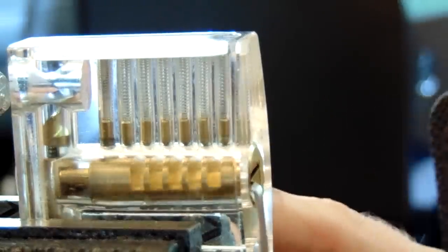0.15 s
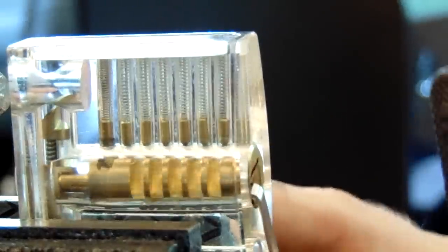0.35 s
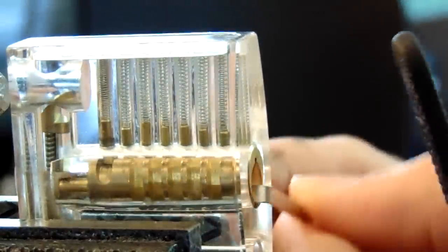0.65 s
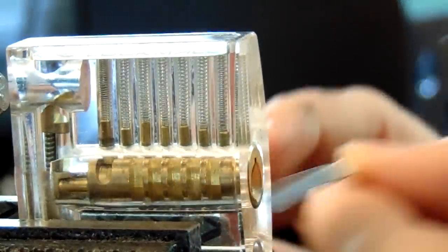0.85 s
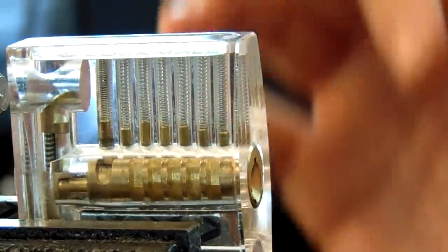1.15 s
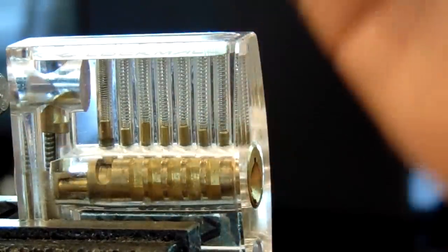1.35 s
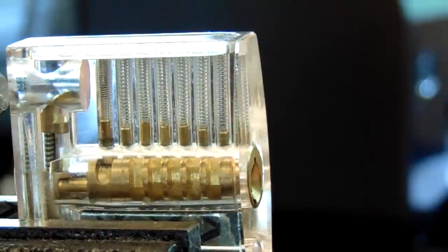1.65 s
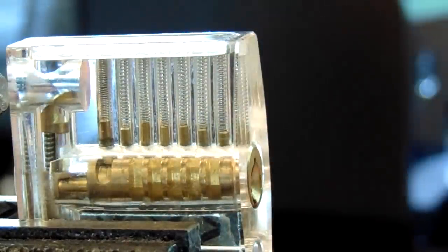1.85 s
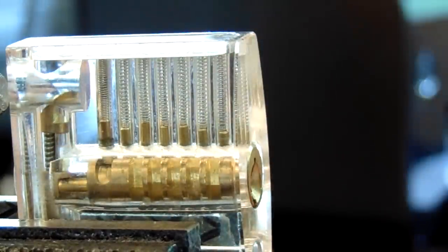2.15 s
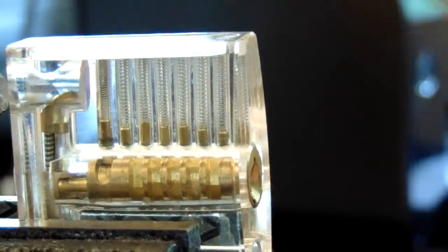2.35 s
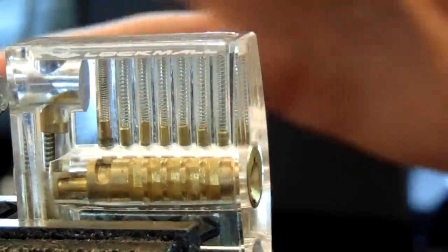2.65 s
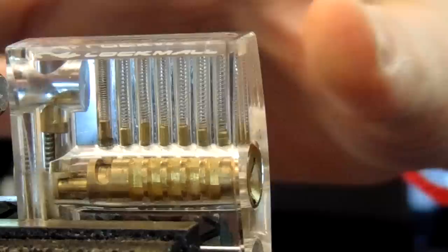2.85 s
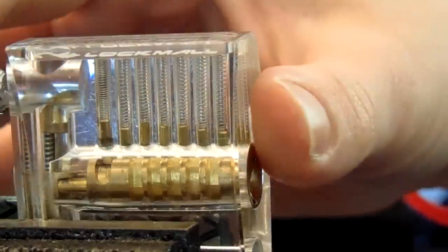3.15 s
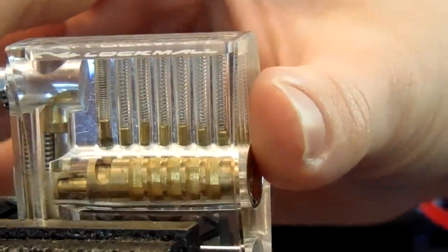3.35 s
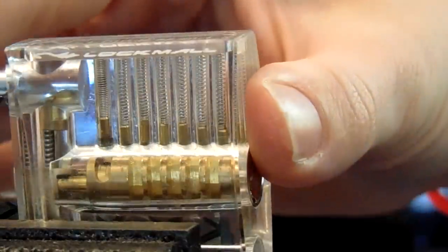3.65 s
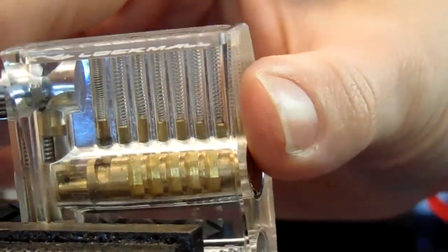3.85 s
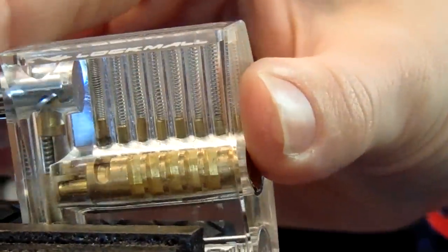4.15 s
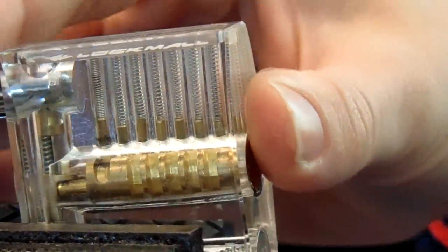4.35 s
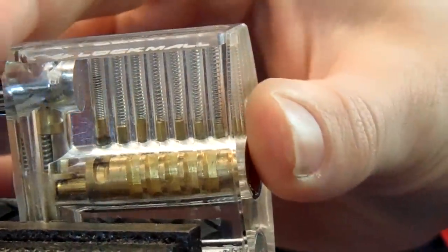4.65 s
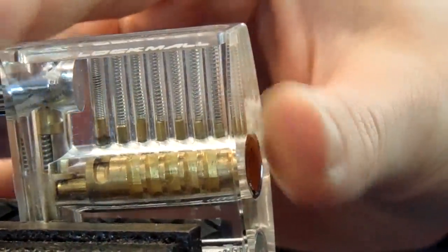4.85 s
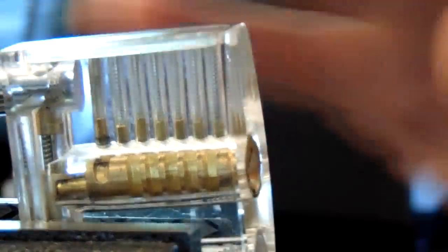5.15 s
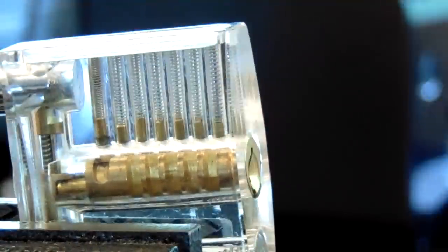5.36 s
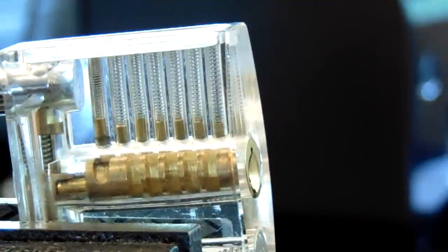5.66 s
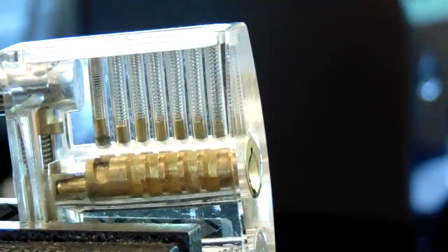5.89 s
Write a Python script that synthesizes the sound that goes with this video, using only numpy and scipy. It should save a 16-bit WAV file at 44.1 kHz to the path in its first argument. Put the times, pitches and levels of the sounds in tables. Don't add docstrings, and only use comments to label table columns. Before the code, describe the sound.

Close metallic ticks and clinks of a tool removed and set down, a few padlock clicks, then one hard snap in a small room.

```python
import sys
import numpy as np
from scipy import signal
from scipy.fft import rfft
from scipy.io import wavfile
from scipy.ndimage import uniform_filter1d

SR = 44100
rng = np.random.default_rng(int(sys.argv[2]) if len(sys.argv) > 2 else 0)


def magnitude_from_level(level_db):
    exponent = np.asarray(level_db, float) / 20
    return 10 ** exponent


def wav_record(signal):
    frames = np.transpose(np.atleast_2d(signal))
    bounded = np.clip(frames, -1, 1)
    quanta = np.round(bounded * 32767).astype(np.int16)
    wavfile.write(sys.argv[1], SR, quanta)


N = 265614

# start in seconds, peak level in dB, rattle t60 in seconds,
# tilt in dB per octave about 5 kHz.
PULL_STRIKES = [
    (.6018, -24, .03, 4),
    (.6053, -8.5, 0.026, -3),
    (.6075, -7, 0.011, -4.5),
    (.6115, -19, 0.014, -6),
    (.6155, -23, .02, -3),
    (.6205, -21, 0.041, 5),
]
FREE_STRIKES = [
    (.6392, -16, 0.016, -0.13),
    (.6458, -17, 0.02, -1.8),
    (.652, -23, 0.018, -0.88),
]
SETTLE_STRIKES = [
    (.8497, -22, 0.011, 4),
    (.858, -49, .012, 1.),
    (.8645, -43, 0.014, 3),
    (.9968, -34, 0.024, -1.5),
    (1.006, -41, 0.013, -2.2),
]
LAY_STRIKES = [
    (2.0092, -29, 0.018, 0.),
    (2.0103, -23.5, 0.07, 0.0),
    (2.0134, -22.5, 0.036, 0.0),
    (2.0314, -30, 0.034, 0.0),
    (2.043, -29.5, 0.051, 0.0),
]
DROP_STRIKES = [
    (2.2252, -22.5, 0.071, -1),
    (2.2388, -30, 0.017, 0),
    (2.2503, -25, 0.099, 0.5),
    (2.2638, -22.5, 0.089, 1.5),
]
SCRAPE_STRIKES = [
    (2.3654, -25.5, 0.068, 0.0),
    (2.373, -22, 0.069, 0.0),
    (2.3764, -21.5, 0.03, 0.0),
    (2.3824, -31, 0.03, 0.0),
]
SLIDE_STRIKES = [
    (2.4326, -22, 0.11, 0.0),
    (2.4405, -24, 0.056, 0.0),
    (2.4502, -25.5, 0.12, 0.0),
    (2.461, -39, 0.033, 0.0),
    (2.4754, -27, 0.058, 0.0),
    (2.4894, -32, 0.15, 0.0),
]

# start in seconds, peak level in dB, rattle t60 in seconds,
# tilt in dB per octave about 5 kHz.
TOUCH_STRIKES = [
    (3.483, -29, 0.04, 0.0),
]
CATCH_STRIKES = [
    (3.7312, -20.5, 0.0047, 1),
    (3.7323, -21, 0.033, 0.),
    (3.740, -31.5, 0.014, 2.),
    (3.747, -39, 0.013, 2.4),
]
PUSH_STRIKES = [
    (3.9345, -39, 0.036, -1.5),
    (3.9393, -11.5, 0.013, -1),
    (3.9408, -18.5, 0.022, -1.5),
    (3.9468, -16, .014, 4.5),
    (3.954, -26, .015, 4),
]
PIN_STRIKES = [
    (4.124, -45.5, 0.049, -16),
    (4.1812, -44.5, .014, -12),
    (4.429, -25, 0.026, 0),
    (4.4325, -30, 0.023, 4.5),
]
SNAP_STRIKES = [
    (4.2256, -14, .01, 8.5),
    (4.2261, 2.5, .022, -0.5),
    (4.2276, 0.5, .018, 0.5),
    (4.2305, 2, 0.031, -3.5),
    (4.2345, -6.5, 0.014, 0),
    (4.2412, -7, .011, 6),
]

# broad colour (Hz, dB per Hz), resonances (Hz, width in Hz, dB over the colour),
# room level in dB, tick share as a ratio to the rattle.
PULL_BODY = ([(700, -41), (1350, -19), (1900, -5), (4000, -3.5), (5500, -14), (8000, -12), (11000, 2),
             (14100, -0.5)], [(4500, 390, 5), (6500, 940, 17), (12700, 360, 8), (13670, 760, 21)], -13, 1.4)
FREE_BODY = ([(530, -51), (900, -19), (1490, -15), (1920, -3), (2660, -5), (7660, -12), (12100, 4),
             (14100, -2.5)], [(1920, 480, 1), (4400, 300, 3), (14000, 300, -1)], -10, .54)
SETTLE_BODY = ([(1500, -45.), (2500, -33), (4500, -2), (7000, -0.5), (14100, 5)], [(4520, 150, 18),
               (12000, 330, 6.3), (13700, 350, 9)], -12, .54)
LAY_BODY = ([(900, -23), (1800, -25), (3500, -18), (5500, -17), (8000, -11.5), (10000, -10), (12500, -2),
            (14100, -12)], [(3310, 200, 6.6), (4270, 130, 11), (6340, 130, 5.), (7810, 150, 12),
            (8500, 150, 6.), (10920, 120, 10.5), (13200, 280, 6.9)], -7.5, .3)
DROP_BODY = ([(530, -32), (900, -12), (1970, -15.5), (3800, -16), (5810, -14.5), (7320, -13), (12300, -0.5),
             (14100, -9)], [(2040, 110, 12.4), (3770, 410, 22), (5250, 140, 12), (7220, 890, 19),
             (9700, 150, 7.4), (10800, 200, 1.3333), (12000, 300, 6), (13200, 200, 5)], -4, 3.4)
SCRAPE_BODY = ([(1180, -59), (2000, -26), (5880, -22.5), (7960, -9.5), (10100, -16), (11800, -10),
               (12700, 0), (14100, -16)], [(6670, 200, 10.6), (7800, 400, 3.), (10920, 170, 21),
               (13600, 300, 8.5)], -7, .1)
SLIDE_BODY = ([(1180, -52), (2000, -30), (2960, -28), (5120, -16.5), (5980, -15), (9600, -7), (10400, -8),
              (14100, -2.5)], [(5230, 110, 8.6), (7960, 230, 6.8), (9750, 130, 7.6), (11070, 150, 12),
              (12200, 200, 3.)], -12.5, 0.36)
TOUCH_BODY = ([(350, -49), (600, -18), (1210, 0.5), (2530, -10), (4590, -11.5), (5590, -8), (7380, -18.5),
              (14100, -25)], [(2430, 300, 12), (5640, 130, 11), (6650, 350, 16.5), (9280, 140, 24.6)],
              -10.5, 0.46)
CATCH_BODY = ([(59, -39), (100, -31), (631, -11), (1360, -2.5), (3240, -11), (6290, -6.5), (6970, -15),
              (14100, -20)], [(2620, 310, 4.5), (3820, 430, 9.7), (6350, 480, 7), (9450, 170, 17)],
              -12, .54)
PUSH_BODY = ([(60, -36), (300, -25.5), (1000, -17), (2300, -15.5), (4500, -16), (7500, -21), (10500, -7.5),
             (14100, -9.5)], [(1680, 150, 2.4), (3258, 690, 12), (6200, 750, 10), (10500, 690, 5.)],
             -10.5, 0.19)
PIN_BODY = ([(300, -47.5), (1500, -18.5), (3000, -4), (8000, -7), (14100, -5.5)], [(1700, 400, 5.),
            (5100, 400, 4.), (6400, 400, 10.), (10000, 500, 8.)], -18, .54)
SNAP_BODY = ([(30, -26.5), (100, -26), (600, -25.5), (1200, -17), (5000, -8.5), (7500, -11), (11000, -7.5),
             (14100, -15.5)], [(1713, 200, 13.5), (3360, 210, 5), (4400, 300, -6), (6230, 400, 5),
             (9460, 280, 8.5), (11340, 500, 13), (12600, 300, 5)], -10.5, 0.34)

# start in seconds, level in dB, pitch in Hz, t60 in seconds.
THUDS = [
    (2.041, -49.5, 205, 0.13),
    (2.40, -50, 217, 0.17),
    (3.735, -51, 119, .1),
    (3.95, -46.5, 31.8, 0.25),
    (4.225, -29.5, 134.9, 0.053),
    (4.226, -36.5, 86.6, 0.12),
    (4.231, -37, 35.4, 0.35),
    (4.231, -37, 456, 0.25),
]
# frequency in Hz, t60 in seconds.
ROOM_T60 = [(80, 0.093), (300, 0.31), (700, 0.4), (1740, 0.3394), (4590, .42), (12100, 0.37)]

# pitch in Hz, level in dB, lag in seconds, t60 in seconds.
BARREL_MODES = [(1133, 4, 0.00174, 0.02), (918, -4, 0.00244, 0.035), (682, 5.5, 0.00176, 0.035),
                (435, 6.5, 0.00359, 0.018)]
HUNTS = [
    (6, 13),
    (73, 79),
    (153, 160),
]

# frequency in Hz, level in dB per Hz.
HISS_COLOUR = [(12, -43.5), (20, -14.5), (65, -8), (98, -14.5), (220, -13.5), (481, -18), (1220, -20),
               (14000, -32.5)]
# pitch in Hz, rms level in dB, wander in Hz.
HUM_LINES = [
    (57.8, -69.5, 2.2),
    (299, -65, 1.7),
]
# time in seconds, rms level in dB.
RUMBLE_LEVEL = [(0.0, -70), (.3, -61), (1.3, -64.5), (1.9, -78), (2.3, -66), (2.8, -83.5), (6.02, -83.5)]

HISS_DB = -55
RUMBLE_HZ, RUMBLE_WANDER_HZ, RUMBLE_WAVER_DB = 62.3, 1.9, -1
FRAMES_PER_S, SEARCH_STEPS, SWEEP_STEPS, PARK_FRAMES = 30, 5, 11, 11.45
EARLY_S, LATE_S = 0.00308, 0.00804
SEARCH_DB, SEARCH_RISE_DB, SWEEP_DB = -47, 0.1, -44
START_DB, PARK_DB, UNEVEN_DB = 3.5, -45, -0.46
EDGE_HZ = 14260


def evened(x):
    return x / np.sqrt(np.mean(x ** 2) + 1e-20)


def read(points, hz):
    f, value = np.transpose(points)
    return np.interp(np.log(hz + 1), np.log(f + 1), value)


def add(mix, start_s, sound):
    part = mix[round(start_s * SR):][:len(sound)]
    part += sound[:len(part)]


def drift(rate_hz):
    t = np.arange(N) / SR
    slow_hz = np.geomspace(rate_hz / 20, rate_hz, num=12)
    return evened(sum(np.sin(2 * np.pi * (f * t + rng.random())) for f in slow_hz))


def causal(gain):
    log_gain = np.log(np.r_[gain, gain[-2:0:-1]] + 1e-5)
    minimum_phase = np.exp(np.conj(signal.hilbert(log_gain)))
    return np.fft.ifft(minimum_phase).real[:len(gain) // 2]


def microphone_hiss():
    frames, hz = N // 512 + 5, np.fft.rfftfreq(2048, 1 / SR)
    a, b, patches = rng.standard_normal((frames, len(hz), 3)).T
    patches = uniform_filter1d(patches, size=20, axis=0)
    patches = evened(uniform_filter1d(patches, size=8, axis=1))
    level = magnitude_from_level(read(HISS_COLOUR, hz)[:, None] + 0.22 * patches)
    hiss = signal.istft((a + 1j * b) * level, nperseg=2048, noverlap=1536)[1]
    return magnitude_from_level(HISS_DB - 1.5) * evened(hiss[:N])


def mains_hum():
    out = np.zeros(N)
    for hz, db, wander_hz in HUM_LINES:
        level = np.sqrt(2) * magnitude_from_level(db + 0.68 * drift(12.))
        turns = np.cumsum(hz + wander_hz * drift(26.0)) / SR
        out += level * np.sin(2 * np.pi * turns)
    return out


def engine_rumble():
    rumble_db = np.interp(np.arange(N) / SR, *np.transpose(RUMBLE_LEVEL))
    rumble_db = rumble_db + RUMBLE_WAVER_DB * drift(10.0)
    turns = np.cumsum(RUMBLE_HZ + RUMBLE_WANDER_HZ * drift(9.)) / SR
    return np.sqrt(2) * magnitude_from_level(rumble_db) * np.sin(2 * np.pi * turns)


def motor_steps():
    search, sweep, steps = np.arange(SEARCH_STEPS), np.arange(SWEEP_STEPS), []
    search_db = SEARCH_DB + SEARCH_RISE_DB * search + START_DB * (search == 0)
    sweep_db = SWEEP_DB + START_DB * (sweep == 0) / 2
    db = np.r_[search_db, sweep_db, PARK_DB]
    for out, back in HUNTS:
        frames = np.r_[out + search, back + sweep, back + PARK_FRAMES]
        late_s = LATE_S * rng.random(len(frames)) ** 2
        start_s = frames / FRAMES_PER_S - EARLY_S + late_s
        steps += zip(start_s, db + UNEVEN_DB * rng.standard_normal(len(db)))
    return steps


def focus_motor():
    t, out, steps = np.arange(1500) / SR, np.zeros(N), motor_steps()
    chances = rng.standard_normal((len(steps), len(BARREL_MODES), 3))
    for (start_s, db), chance in zip(steps, chances):
        knock = np.zeros(len(t))
        for (hz, mode_db, lag_s, t60_s), (detune, wobble, turn) in zip(BARREL_MODES, chance):
            u = np.maximum(t - lag_s, 0)
            shape = magnitude_from_level(mode_db + 0.88 * wobble - 60 * u / t60_s) * (1 - np.exp(-u / 0.001))
            knock += shape * np.sin(2 * np.pi * hz * (1 + 0.031 * detune) * u + 0.6 * turn)
        knock *= magnitude_from_level(db + 1.5) / abs(knock).max()
        add(out, start_s - .001, knock)
        whirr = signal.fftconvolve(knock, rng.standard_normal(1500))
        add(out, start_s + 0.00408, magnitude_from_level(db - 24.5) * evened(whirr))
    return out


def bench():
    t, out = np.arange(SR // 4) / SR, np.zeros(N)
    for start_s, db, hz, t60_s in THUDS:
        swell_and_decay = magnitude_from_level(db - 60 * t / t60_s) * (1 - np.exp(-t / .006))
        add(out, start_s, swell_and_decay * np.sin(2 * np.pi * hz * t))
    return out


def room(x):
    taps = np.zeros(SR // 2)
    at = np.arange(0, len(taps) - 10, 10)
    taps[at + rng.integers(0, 10, len(at))] = rng.choice([-1., 1.], len(at))
    hz, t, z = signal.stft(taps, SR, nperseg=256)
    decay = magnitude_from_level(-60 * t / read(ROOM_T60, hz)[:, None])
    tail = signal.istft(z * decay, SR, nperseg=256)[1]
    tail *= np.clip((np.arange(len(tail)) / SR - .004) / 0.013, 0, 1)
    return signal.oaconvolve(x, tail / np.linalg.norm(tail))[:N]


def struck(strikes, colour, peaks, room_db, tick):
    hz, t, out = np.fft.rfftfreq(8192, 1 / SR), np.arange(2048) / SR, np.zeros(N)
    rings = sum(magnitude_from_level(db) / (1 + (2 * (hz - f) / width) ** 2) for f, width, db in peaks)
    body = magnitude_from_level(read(colour, hz)) * (1 + rings)
    octaves = np.log2(np.maximum(hz, 300) / 5000)
    contacts = rng.standard_normal((len(strikes), len(t)))
    for (start_s, db, t60_s, tilt_db), rattle in zip(strikes, contacts):
        rattle = rattle * (magnitude_from_level(-60 * t / max(t60_s, .001)) + tick * np.exp(-t / 0.00014))
        even = np.sqrt(uniform_filter1d(abs(rfft(rattle, 8192)) ** 2, size=60))
        ring = signal.fftconvolve(rattle, causal(body / even * magnitude_from_level(tilt_db * octaves)))
        add(out, start_s, magnitude_from_level(db) * ring / abs(ring).max())
    flatter = causal((1 + rings) ** -.25)
    return out + magnitude_from_level(room_db + 0.5) * room(signal.oaconvolve(out, flatter)[:N])


def tension_tool():
    leaving = struck(PULL_STRIKES, *PULL_BODY) + struck(FREE_STRIKES, *FREE_BODY)
    leaving += struck(SETTLE_STRIKES, *SETTLE_BODY)
    landing = struck(LAY_STRIKES, *LAY_BODY) + struck(DROP_STRIKES, *DROP_BODY)
    sliding = struck(SCRAPE_STRIKES, *SCRAPE_BODY) + struck(SLIDE_STRIKES, *SLIDE_BODY)
    return leaving + landing + sliding


def padlock():
    clicks = struck(TOUCH_STRIKES, *TOUCH_BODY) + struck(CATCH_STRIKES, *CATCH_BODY)
    clicks += struck(PUSH_STRIKES, *PUSH_BODY)
    return clicks + struck(PIN_STRIKES, *PIN_BODY) + struck(SNAP_STRIKES, *SNAP_BODY)


def scene():
    background = microphone_hiss() + mains_hum() + engine_rumble()
    return (background + focus_motor() + bench() + tension_tool() + padlock())[None]


def roll_off(x):
    return signal.sosfilt(signal.butter(12, 15380, fs=SR, output="sos"), x)


def record(dry):
    power = uniform_filter1d(dry[0] ** 2, size=800, origin=399)
    power_db = 10 * np.log10(abs(power) + 1e-12)
    rise_db = np.arange(N) * 2.5 / SR
    cut_db = np.maximum.accumulate(.36 * np.maximum(power_db + 24, 0) + rise_db) - rise_db
    ducked = dry / magnitude_from_level(signal.lfilter([.0004], [1, .0004 - 1], cut_db))
    band_limit = signal.firwin(383, EDGE_HZ, window=("kaiser", 9), fs=SR)
    narrow = signal.oaconvolve(ducked, band_limit[None], "same")
    return roll_off(np.clip(narrow, -1, 1))


dry = scene()
out = record(dry)
wav_record(out)
```